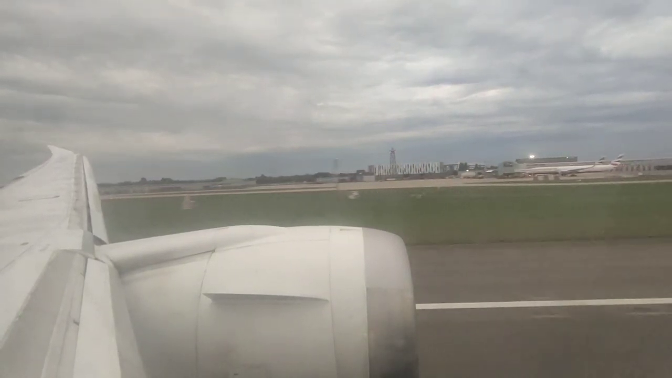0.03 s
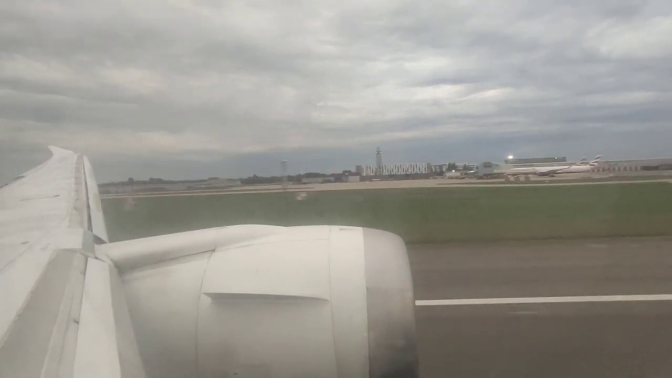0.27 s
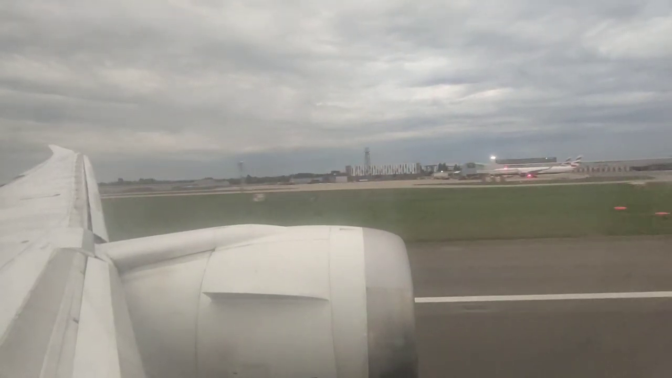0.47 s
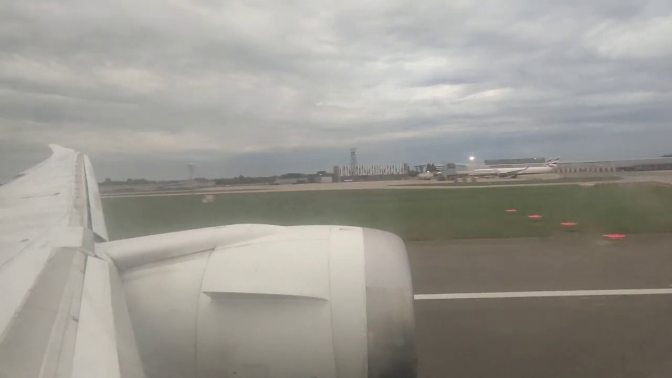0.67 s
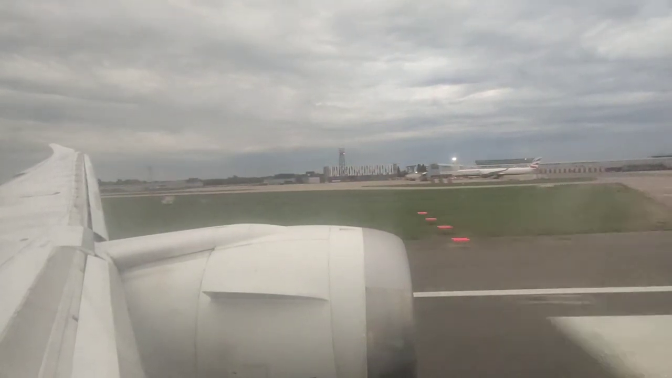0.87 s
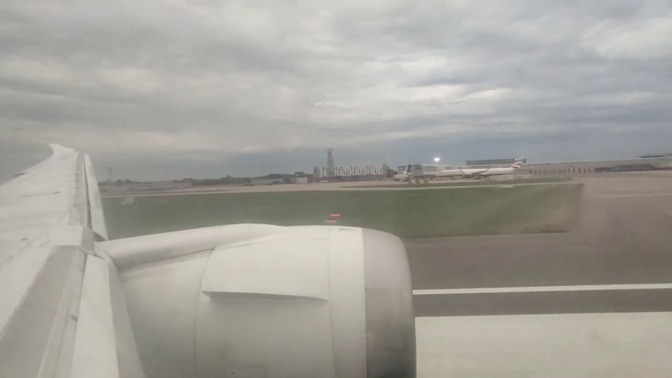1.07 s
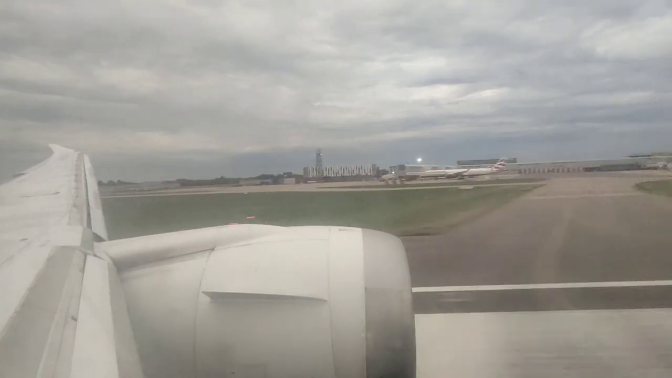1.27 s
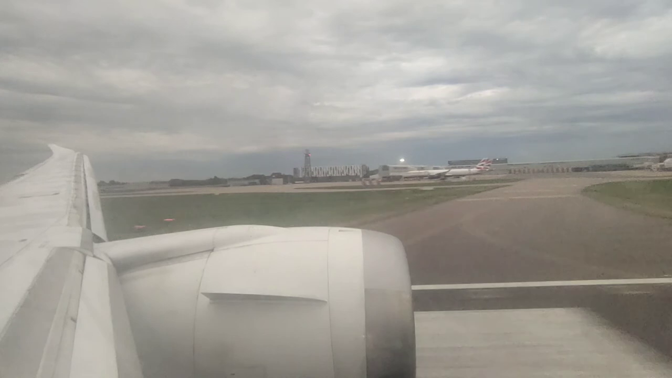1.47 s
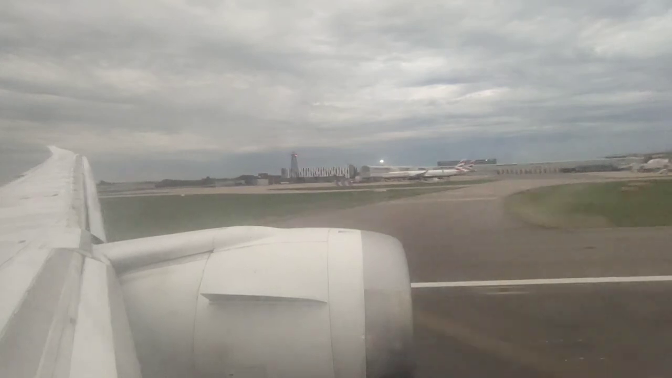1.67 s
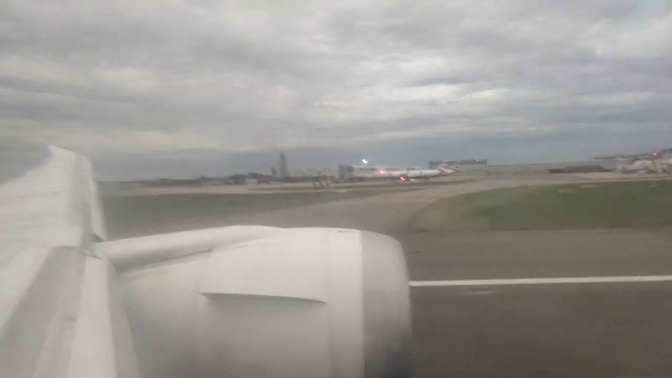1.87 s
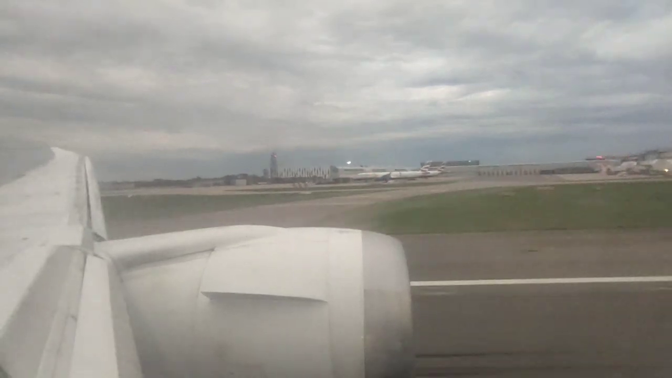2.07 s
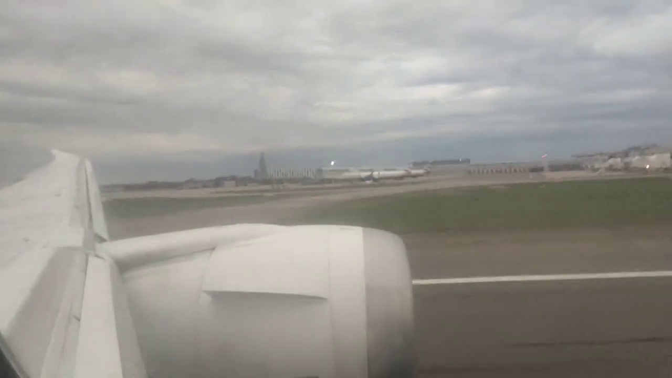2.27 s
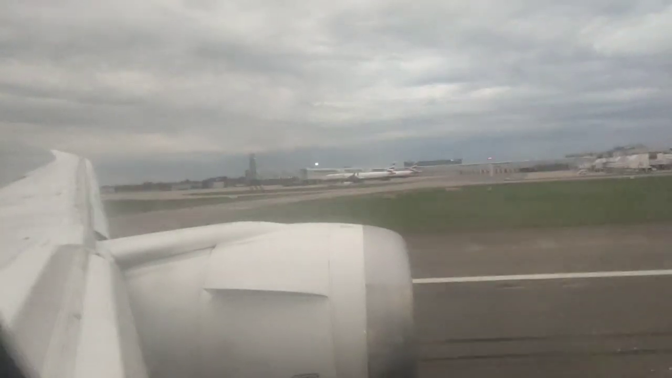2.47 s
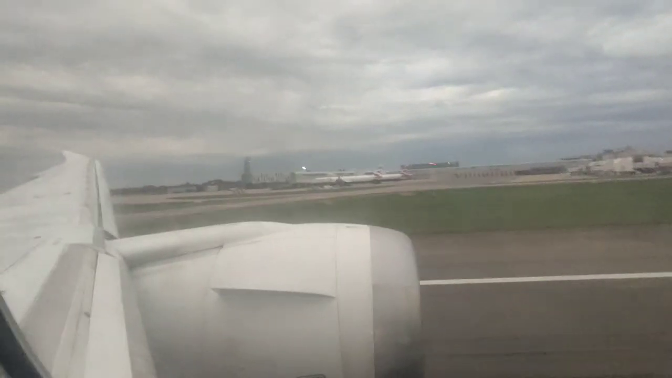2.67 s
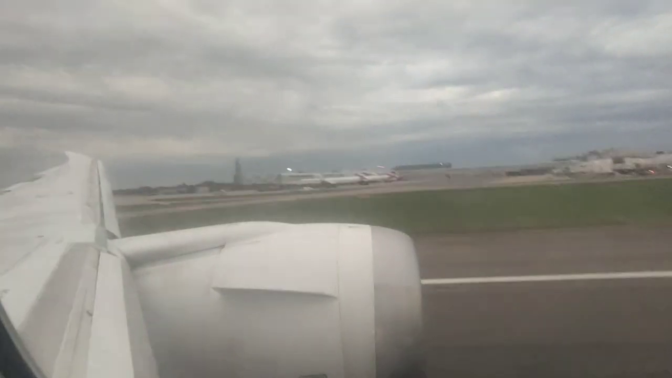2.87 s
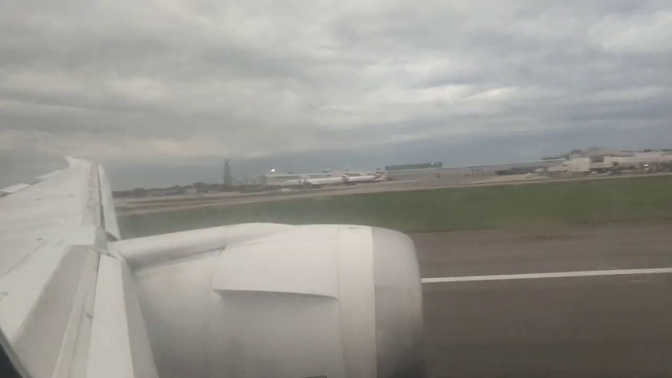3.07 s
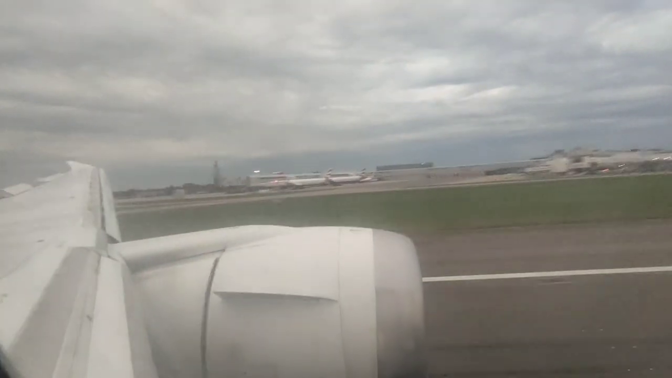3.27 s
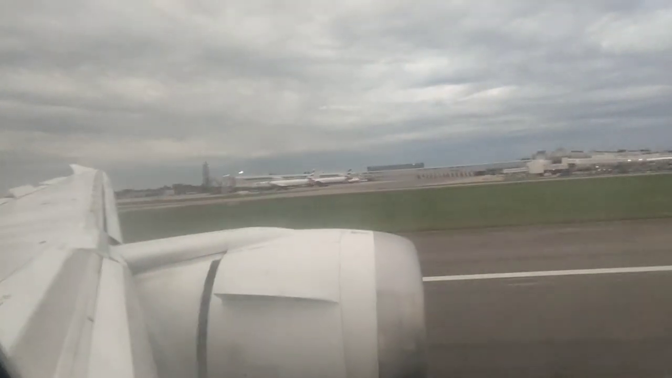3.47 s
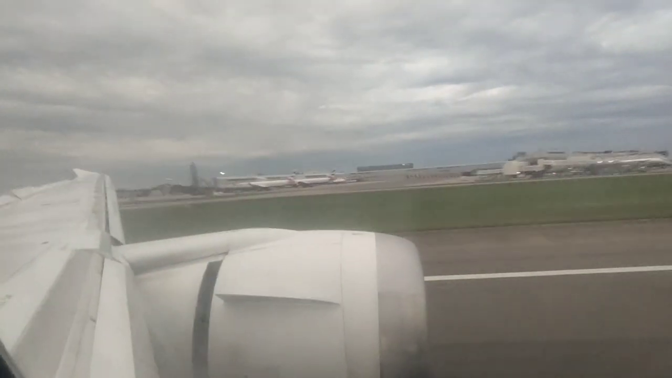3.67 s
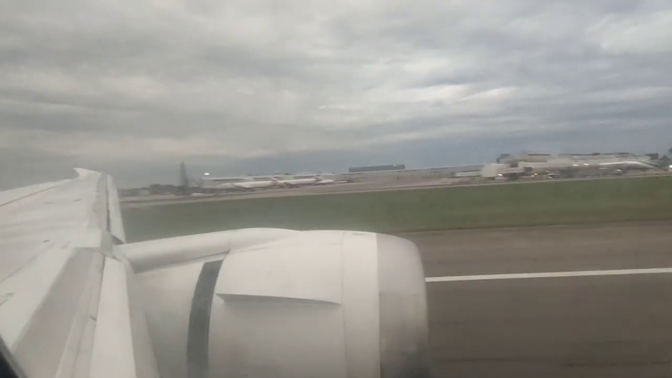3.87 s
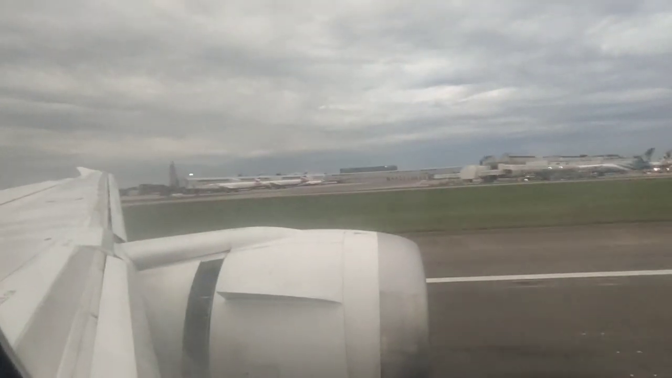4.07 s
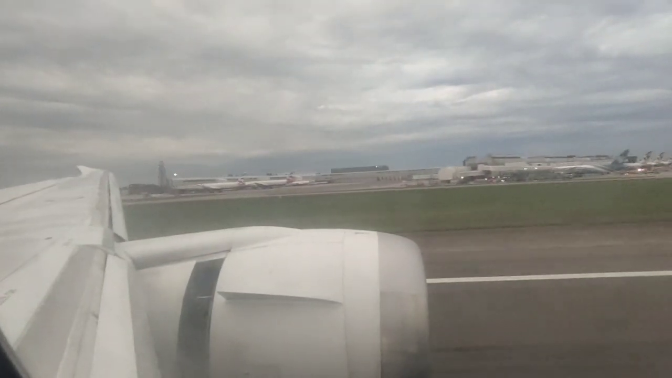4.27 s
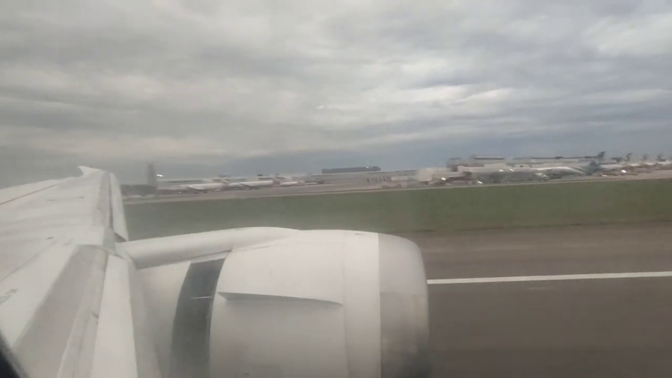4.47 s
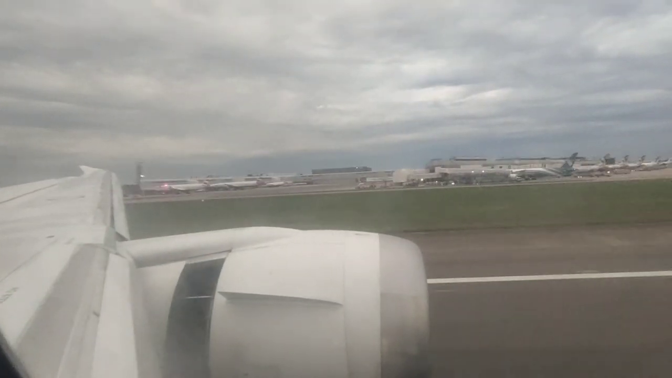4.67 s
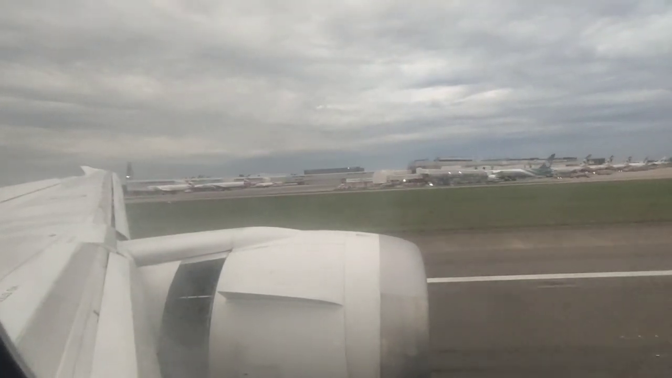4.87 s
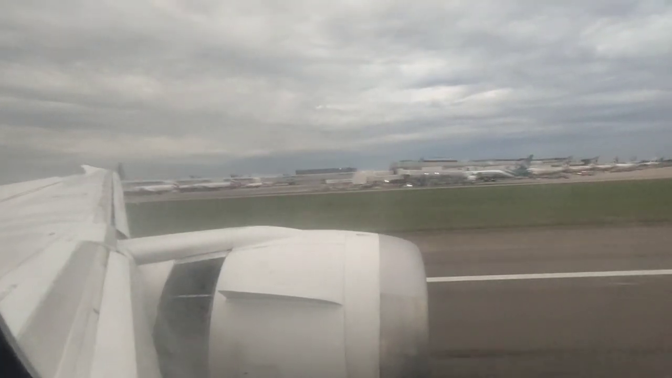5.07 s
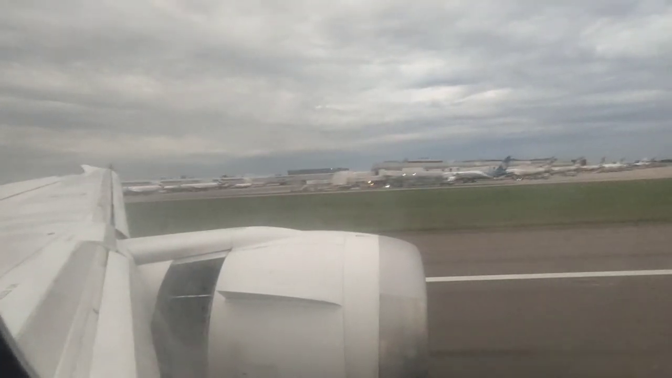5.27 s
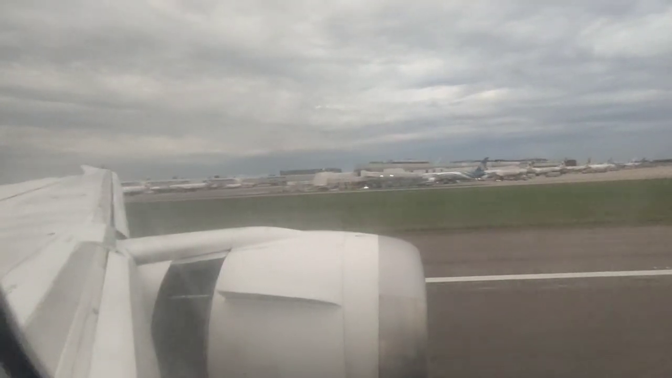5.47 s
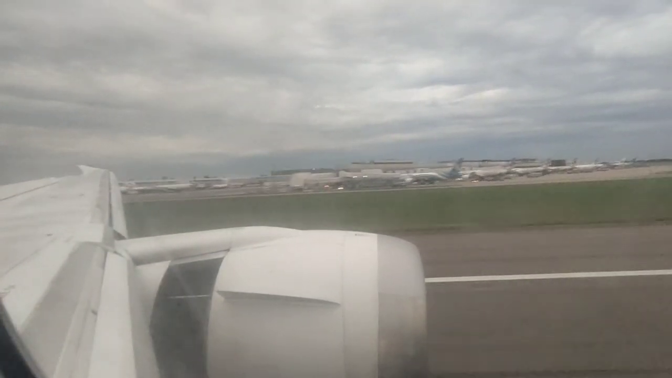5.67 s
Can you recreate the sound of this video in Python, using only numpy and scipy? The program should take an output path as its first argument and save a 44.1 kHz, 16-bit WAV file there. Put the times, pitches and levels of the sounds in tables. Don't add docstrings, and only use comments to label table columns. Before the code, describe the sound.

Inside an airliner cabin by the window, a deep steady drone with faint vent hiss holds for about a second and a half. Touchdown brings heavy low booms and a dense burst of locker and panel rattles with tiny latch clicks. Knocks thin out over softer bumps, then reverse thrust swells the roar with more deep jolts. Close, slightly overloaded stereo phone pickup.

```python
import sys
import numpy as np
from scipy import signal
from scipy.fft import rfft, irfft
from scipy.io import wavfile
from scipy.ndimage import uniform_filter1d

SR = 44100
rng = np.random.default_rng(int(sys.argv[2]) if len(sys.argv) > 2 else 0)


def gain_from_db(level_db):
    decades = np.asarray(level_db, float) / 20
    return 10 ** decades


def master(y):
    cut = np.clip(np.atleast_2d(y).T, -1, 1)
    pcm = np.round(cut * 32767)
    wavfile.write(sys.argv[1], SR, pcm.astype(np.int16))


N = 252252
HZ = np.fft.rfftfreq(N, 1 / SR)
TIME = np.arange(N) / SR
EARS = np.array([[1], [-1]])

# pitch_hz, level_db (per Hz)
CABIN_COLOUR = [(13, -63.5), (22, -42), (33, -26), (50, -24), (74, -6), (97, 1.5), (164, -2.5), (204, -4),
                (234, -7), (373, -11), (417, -19.5), (579, -23.5), (899, -28.5), (3010, -51), (3270, -47.5),
                (3550, -52), (15700, -63.5)]
# pitch_hz, width_hz, level_db
HULL_MODES = [(72, 17, -11), (117.4, 12.5, -0.5), (137.1, 12.1, 1), (202, 48, -4), (300, 88, -10)]
# pitch_hz, width_hz, level_db
LINING_MODES = [(509.6, 99, 2), (1490, 110, -4.5), (2520, 800, 1.5)]
RULE_HZ = (55, 120, 330, 900)


def drone():
    feels_gear = (1, 0.19, 0.01, 0.042)
    feels_thrust = (0.1, 0.9, 0.73, 0.69)
    feels_shake = (0.088, 0.027, 0.057, 0.59)
    moves = np.transpose([feels_gear, feels_thrust, feels_shake]) @ np.array(controls())
    spectrum = field(CABIN_COLOUR) * lift(HULL_MODES) * lift(LINING_MODES)
    boom = irfft(spectrum * (HZ > 75) * (HZ < 170), N)
    spectrum = spectrum * gain_from_db(-18.5) / np.sqrt(np.mean(boom ** 2))
    out = 0
    for octave in np.arange(4.5, 14.5, 0.5):
        share = np.cos(np.pi * np.clip(np.log2(HZ + 1) - octave, -0.5, 0.5)) ** 2
        pull = [on_hz(list(zip(RULE_HZ, row)), 2 ** octave) for row in np.eye(len(RULE_HZ))]
        pull[0] *= np.clip((octave - 4.6) / 1.5, 0.3, 1)
        pull[-1] *= np.clip((13.2 - octave) / 3.07, 0, 1)
        flutter_db = np.clip((11.3 - octave) / 0.83, 0.25, 1) * 0.99 * walk(7.4) + 0.75 * walk(20.873)
        out = out + gain_from_db(np.dot(pull, moves) + flutter_db) * irfft(spectrum * share, N)
    return out


# time_s, gear_load_db (above the flare)
GEAR_LOAD = [(1.5, 1.5), (1.68, 1.5), (1.78, -4.5), (1.9, 17), (2.3, 11.5), (2.55, 9.5), (2.8, 5.5),
             (3.0, 4.5), (3.35, 16), (3.7, 4), (4.0, 11), (4.6, 15.5), (5.2, 7), (5.45, 6), (5.72, 14.5)]


def controls():
    reverse_s, spool_s, reverse_db = 4.55, 0.32, 4.5
    gear = np.interp(TIME, *np.transpose(GEAR_LOAD))
    spool = np.clip((TIME - reverse_s) / spool_s, 0, 1)
    thrust = reverse_db * np.sin(spool * np.pi / 2) ** 2
    s, buzz_db, _ = np.transpose(TRIM_SHAKE)
    return gear, thrust, np.interp(TIME, s, buzz_db - buzz_db[0])


# start_s, level_db, pitch_hz
STRUT_BLOWS = [(1.65, -15, 75.2), (1.822, -13.5, 97), (1.91, -10.5, 84.4), (1.969, -9.5, 105.2),
               (2.062, -8.5, 107.2), (2.191, -14.5, 72), (2.3, -4.5, 119), (2.418, -10, 114),
               (2.47, -10, 115), (2.975, -14, 105), (3.198, -8.5, 100), (3.321, -14.5, 97.3),
               (3.86, -12.5, 91.6), (4.719, -11.5, 113.3), (4.962, -3.5, 97.4), (5.321, -4.5, 129.1),
               (5.549, -12, 117.4), (2.027, -17, 147.6), (3.0, -8.5, 114.2), (4.645, -21, 107.5),
               (4.78, -10, 119), (4.84, -19, 128.6), (5.081, -12, 119.3), (5.19, -11, 116.8),
               (5.69, -9.5, 107)]
# start_s, level_db, pitch_hz
SLAPS_AND_HEAVES = [(1.885, -26, 360), (1.935, -18, 227), (1.5, -23, 420), (2.179, -11.5, 320),
                    (2.5, -43, 400), (2.1, -20.5, 355), (2.7, -17, 450), (2.9, -30, 450),
                    (5.261, -13, 68.3), (5.45, -18, 64.4), (5.62, -33.5, 33.8), (3.879, -17.5, 39),
                    (1.84, -16, 68), (0.68, -25, 310), (0.28, -34, 780), (1.8, -16, 300), (2.0, -20.5, 200),
                    (3.4, -27, 370), (5.53, -21, 190), (5.37, -21, 68), (0.76, -27, 78), (3.1, -22, 75),
                    (3, -13.5, 110), (1.73, -24.5, 328), (3.979, -25, 370), (4.4, -18, 286), (4, -23, 400),
                    (4.79, -17, 340), (5.595, -19.5, 350)]


def thumps():
    rise_cycles = 2.07
    out = np.zeros(N + SR)
    t = TIME[:SR]
    for s, db, hz in STRUT_BLOWS + SLAPS_AND_HEAVES:
        rise = t * hz / rise_cycles
        swell = rise * np.exp(1 - rise)
        i = int(s * SR)
        out[i:i + SR] += gain_from_db(db) * swell * np.sin(2 * np.pi * hz * t)
    return out[:N]


# pitch_hz, level_db (per Hz)
CRACK_COLOUR = [(1470, -31.5), (2500, -0.5), (2920, -8.5), (3480, -6), (5910, -13), (6950, -6.5),
                (9970, -13), (10800, -17), (14700, -18), (15700, -22.5)]
# pitch_hz, level_db (per Hz)
PANEL_COLOUR = [(250, -33), (450, 3.5), (700, 3), (1000, 5.5), (1500, -7), (2000, -11.5), (2800, -44),
                (4500, -42)]


def trim():
    s, db, body_db, pan_db, t60, body_hz = knocks()
    sides = (gain_from_db(db) * gain_from_db(EARS * pan_db / 2)).T[:, :, None]
    bodies = gain_from_db(body_db)[:, None, None] * sides
    vent_hiss_db = -52.5
    sides = sides * np.sqrt(np.clip(1 - gain_from_db(vent_hiss_db - db) ** 2, 0.05, 1))[:, None, None]

    fronts = decays(s, gain_from_db(-9.0) * sides, 0.15 * t60, 0.00061)
    cracks = np.hypot(fronts, decays(s, gain_from_db(-9.0) * sides, t60, 0.0018))
    sharp = sides * gain_from_db(0.52 * (db + 26.5))[:, None, None]
    sizzles = np.hypot(decays(s, gain_from_db(-15.5) * sharp, 0.3 * t60, 0.0005),
                       decays(s, gain_from_db(-20.0) * sharp, 0.75 * t60, 0.0015))
    thuds = np.hypot(decays(s, gain_from_db(-3.5) * bodies, 0.35 * t60, 0.00052),
                     decays(s, gain_from_db(-2) * bodies, 0.85 * t60, 0.00092))

    buzz, buzz_sizzle, buzz_panel = buzzes()
    treble = field(CRACK_COLOUR)
    crack = unit(irfft(treble * (HZ < 10000), N))
    sizzle = unit(irfft(treble * (HZ >= 10000), N))
    panel = unit(irfft(field(PANEL_COLOUR) * lift(LINING_MODES), N))
    out = crack * np.hypot(cracks, buzz)
    out = out + sizzle * np.hypot(sizzles, buzz_sizzle)
    out = out + panel * np.hypot(thuds, buzz_panel)

    out = out + raps(s, gain_from_db(-5) * bodies, body_hz)
    out = out + rings(s, gain_from_db(-10.0) * bodies, body_hz, 1.55 * t60, 0.091)
    clasp_hz = 1870 * np.exp(0.15 * rng.standard_normal(len(s)))
    return out + rings(s, gain_from_db(-10.5) * sides, clasp_hz, 0.65 * t60, 0.093)


# start_s, crack_db, body_over_crack_db, t60_s
LOCKER_KNOCKS = [(0.538, -39.5, 8, 0.056), (0.9244, -50, 0, .1), (1.6804, -34.5, 10.5, 0.1),
                 (1.706, -30.5, 7, 0.1), (1.777, -33, 4, .13), (1.826, -29, 1, 0.051),
                 (1.86, -50, 4, 0.073), (2.172, -37.5, 17.5, 0.057), (2.183, -20, -1, 0.082),
                 (2.1896, -22.5, 3.5, .05), (2.1959, -26.5, 6, 0.032), (2.2846, -32.5, -8, 0.44),
                 (2.32, -32.5, 11.5, 0.13), (2.5874, -26.5, 7, 0.16), (2.694, -29.5, 2, 0.19),
                 (2.8552, -33, 7.5, 0.31), (2.9398, -29.5, 2, 0.2), (2.969, -29.5, 6.5, 0.045),
                 (3.0692, -32, 5, 0.062), (3.1161, -32.5, 6, 0.13), (3.2132, -25, 3, 0.057),
                 (3.26, -41.5, -3, .1), (3.3413, -33, 6.5, 0.1), (3.4252, -39, 13.5, .11),
                 (3.4524, -30.5, 4, 0.088), (3.5586, -34.5, -10.5, 0.1), (4.1833, -28.5, -1, 0.064),
                 (5.3702, -46, 11, 0.088), (5.595, -30, 6.5, 0.11)]
# start_s, crack_db, body_over_crack_db, body_hz
WALL_KNOCKS = [(0.2044, -46, 13, 655), (1.7923, -32.5, 6.5, 1160), (1.9437, -42, 17, 1040),
               (1.99, -36, 13.5, 820), (2.0494, -38, 13.5, 614), (2.1187, -37, 18, 1123),
               (2.244, -37, 13.5, 890), (2.3887, -31, 9.5, 1030), (2.4272, -36, 19, 780),
               (2.478, -31, -3, 942), (2.5494, -44, 20.5, 730), (2.619, -39, 13, 880),
               (3.0341, -25, 7.5, 880), (3.1642, -29.5, 7, 730), (3.1801, -33.5, 8.5, 1090),
               (3.3029, -31, 10.5, 717), (3.5198, -33, 9.5, 870), (3.6254, -36, 12.5, 823),
               (3.654, -38.5, 13, 590), (4.4914, -46, 11.5, 815), (4.55, -48, 21.5, 786),
               (4.597, -39, 8.5, 630), (4.694, -41, 9, 740), (4.7409, -43, 15.5, 724),
               (4.778, -42, 18.5, 610), (5.0894, -42, 13.5, 610), (5.1985, -44.5, 6, 670),
               (5.633, -38.5, 7.5, 756), (1.92, -47, 12, 520), (2.035, -41.5, 10.5, 760),
               (2.082, -42, 11.5, 560), (2.15, -39, 13.5, 620), (2.262, -37.5, 13.5, 1320),
               (2.283, -42, 10.5, 790), (2.312, -37, 16.5, 570), (2.369, -38.5, 9.5, 556),
               (2.523, -40.5, 13, 641), (2.706, -36, 13.5, 885), (4.505, -49.5, 16.5, 1300),
               (4.9, -44.5, 10, 2290), (5.305, -44.5, 16, 920), (5.36, -37.5, 8, 1140),
               (5.55, -42.5, 12.5, 850), (5.593, -41, 12.5, 800)]


def knocks():
    s, db, body_db, t60 = np.transpose(LOCKER_KNOCKS)
    wall_s, wall_db, wall_body_db, wall_hz = np.transpose(WALL_KNOCKS)
    pan_db = -2 + 4 * rng.standard_normal(len(s) + len(wall_s))
    locker_hz = 820 * np.exp(0.15 * rng.standard_normal(len(s)))
    wall_t60 = np.full(len(wall_s), 0.11)
    return (np.r_[s, wall_s], np.r_[db, wall_db], np.r_[body_db, wall_body_db], pan_db,
            np.r_[t60, wall_t60], np.r_[locker_hz, wall_hz])


# time_s, buzz_db, panel_over_buzz_db
TRIM_SHAKE = [(1.55, -62, 3), (1.7, -61, 15), (1.99, -55, -4), (2.16, -48, 6), (2.215, -52, 11),
              (2.245, -44.5, 8), (2.31, -42.5, 8), (2.46, -46, 8.5), (2.54, -56.5, 9), (2.7, -55.5, -1),
              (2.88, -57, 12.5), (3.07, -59.5, 5.5), (3.85, -60, 8), (5.48, -62.5, 10), (5.72, -54, 6)]


def buzzes():
    t, buzz_db, panel_db = np.transpose(TRIM_SHAKE)
    contacts_per_s, contact_decay_s = 650, 0.0095
    contacts = (rng.random(N) < contacts_per_s / SR) * gain_from_db(2.3 * rng.exponential(size=N))
    power = signal.lfilter([1], [1, -np.exp(-1 / (contact_decay_s * SR))], contacts ** 2)
    buzz = gain_from_db(np.interp(TIME, t, buzz_db, left=-120) + 2.5) * unit(np.sqrt(power))
    brighter_db = 0.2 * (np.interp(TIME, t, buzz_db) + 55)
    return buzz, gain_from_db(-10.0) * buzz * gain_from_db(brighter_db), buzz * gain_from_db(np.interp(TIME, t, panel_db))


def raps(times, sizes, pitches_hz):
    out = np.zeros((2, N + SR))
    for s, size, hz in zip(times, sizes, pitches_hz):
        turns = hz * TIME[:SR // 20]
        tone = np.sin(2 * np.pi * turns) + gain_from_db(-6) * np.sin(2 * np.pi * 1.7 * turns)
        i = int(s * SR)
        out[:, i:i + len(turns)] += size * gain_from_db(-60 * turns / 10) * tone
    return out[:, :N]


def rings(times, sizes, pitches_hz, t60s, widths):
    out = np.zeros((2, N + SR))
    t = TIME[:SR // 8]
    widths = np.broadcast_to(widths, len(times))
    for s, size, hz, t60, width in zip(times, sizes, pitches_hz, t60s, widths):
        edges_hz = [hz / (1 + width), min(hz * (1 + width), 0.49 * SR)]
        band = signal.butter(1, edges_hz, "band", fs=SR, output="sos")
        noise = rng.standard_normal((2, len(t))) + 0.88 * rng.standard_normal(len(t))
        ring = unit(signal.sosfilt(band, noise))
        i = int(s * SR)
        out[:, i:i + len(t)] += size * ring * gain_from_db(-60 * t / t60)
    return out[:, :N]


# start_s, level_db, left_over_right_db, pitch_hz
CASE_TICKS = [
    (2.0837, -36, 10, 14650),
    (2.0937, -37, 7, 14050),
    (4.663, -39.5, 7, 15000),
    (5.3847, -41.5, 5.5, 15600),
]
# start_s, level_db, left_over_right_db, pitch_hz
LATCH_TICKS = [(5.01, -44, 12, 7280), (5.127, -41.5, 8.5, 3450), (5.158, -48, -3, 6780),
               (5.2485, -45.5, -8, 7140), (5.329, -46, -6, 8500), (5.343, -43.5, -7.5, 7400),
               (5.423, -40.5, -5, 7430), (1.682, -36, -7, 8900), (1.708, -42, -7, 9300),
               (1.779, -43.5, -2.5, 8500), (1.795, -45.5, -2.5, 8300), (1.944, -42, -5, 8800),
               (2.588, -34.5, -3.5, 7960), (2.857, -37, 1, 7200), (3.119, -44, 0.5, 8200),
               (2.118, -40, -1.5, 7550), (2.128, -42, -3, 8300), (2.0, -40, -2.5, 8600),
               (2.235, -41, -1, 6800), (2.277, -42.5, 1.5, 7600), (3.428, -40.5, 1.5, 6840),
               (4.495, -49.5, 2, 4280), (4.594, -44.5, 2, 2620), (5.088, -48, 0.5, 4200),
               (5.197, -52, 4, 2590), (5.596, -40.5, -1.5, 7000), (5.635, -44, -0.5, 4700),
               (2.12, -34, -2, 1530), (2.247, -34, 0.5, 1700), (2.615, -31, -5, 1750),
               (2.862, -37, 1.5, 2260), (3.036, -30.5, -2, 2470), (3.119, -34.5, 0, 2420),
               (3.167, -42.5, 1, 2450), (3.175, -36.5, -1.5, 1700), (3.31, -36, -2, 1800),
               (3.427, -35, -1, 1780), (3.522, -35.5, -2, 1790), (3.655, -40, -1.5, 1800)]


def ticks():
    s, db, pan_db, hz = np.transpose(list(CASE_TICKS) + list(LATCH_TICKS))
    case = np.arange(len(s)) < len(CASE_TICKS)
    sides = (gain_from_db(db) * gain_from_db(EARS * pan_db / 2)).T[:, :, None]
    tones = sides * gain_from_db(np.where(case, -1.5, -5))[:, None, None]
    snaps = sides * gain_from_db(np.where(case, -3, -5.0))[:, None, None]
    ring_cycles = np.where(case, 110, 330)
    out = rings(s, tones, hz, ring_cycles / hz, 0.027)
    snap_hz = np.where(case, 12500, 10000)
    return out + rings(s, snaps, snap_hz, np.full(len(s), 0.007), np.where(case, 0.3, 0.9))


# start_s, length_s, top_hz, partner_over_top (ratio), level_db
SEAL_SQUEAKS = [
    (2.78, .08, 1870, 1.02, -48),
    (2.765, 0.039, 2520, 1.25, -50),
    (4.29, .04, 11000, 1.12, -79),
    (4.395, .09, 10900, 1.17, -61),
    (4.48, .03, 10600, 1.05, -69),
    (4.53, .03, 11860, .97, -63),
    (4.555, 0.027, 10900, .96, -63),
    (4.585, 0.022, 9400, .93, -64),
]


def squeaks():
    out, wobble = 0, walk(120)
    for s, length, hz, partner, db in SEAL_SQUEAKS:
        u = (TIME - s) / length
        fade = np.clip(np.minimum(u, 1 - u) * length / 0.012, 0, 1)
        main_hz = hz * np.interp(u, [0, 0.15, 0.62, 1], [0.94, 1, 1, 0.92])
        partner_hz = hz * (partner - 0.04 * u)
        main, second = (np.sin(2 * np.pi * np.cumsum(f * (1 + 0.004 * wobble)) / SR)
                        for f in (main_hz, partner_hz))
        out = out + fade * gain_from_db(db + 2.3 * wobble) * (main + gain_from_db(-9 + 2.6 * walk(59.6)) * second)
    return out * gain_from_db(EARS * -4.5)


# pitch_hz, first_level_db, last_level_db
WHINE_TONES = [(3194, -62, -63.5), (4791, -76, -71), (7562, -85, -81), (9114, -81, -92), (10080, -81, -83),
               (10712, -87, -83), (10890, -79, -83), (11343, -88, -83), (11832, -92, -87)]


def whine():
    out = 0
    for hz, first_db, last_db in WHINE_TONES:
        level_db = first_db + (last_db - first_db) * TIME / TIME[-1] + 0.4 * walk(15)
        phase = 2 * np.pi * np.cumsum(hz * (1 + 0.0004 * walk(18.0))) / SR
        out = out + np.sqrt(2) * gain_from_db(level_db) * np.sin(phase + EARS * rng.uniform(0, 0.33))
    return out


def on_hz(table, hz=HZ):
    f, v = np.transpose(table)
    return np.interp(np.log(hz + 1), np.log(f + 1), v)


def unit(x):
    return x / np.sqrt(np.mean(x ** 2))


# pitch_hz, side_over_mid_db
PORT_SIDE_LEVEL = [(60, -17.5), (110, -17), (200, -15.5), (380, -8.5), (700, 0.5), (1290, 0), (2380, 1),
                   (4400, 1.5), (8120, 0.5), (15000, 0)]


def field(colour):
    mid, side = rfft(rng.standard_normal((2, N)))
    return gain_from_db(on_hz(colour)) * (mid + EARS * gain_from_db(on_hz(PORT_SIDE_LEVEL)) * side)


def lift(modes):
    return 1 + sum(gain_from_db(db) / (1 + 2j * (HZ - hz) / width) for hz, width, db in modes)


def walk(rate):
    k = int(SR / rate)
    held = np.repeat(rng.standard_normal(N // k + 1), k)
    return 1.47 * uniform_filter1d(uniform_filter1d(held, k), k)[:N]


def decays(times, sizes, t60s, rise_s):
    power = np.zeros((2, N))
    for s, size, t60 in zip(times, sizes, t60s):
        i = int(s * SR)
        t = TIME[:min(N - i, int(t60 * SR) + 1)]
        power[:, i:i + len(t)] += (size * (1 - np.exp(-t / rise_s)) * gain_from_db(-60 * t / t60)) ** 2
    return np.sqrt(power)


def scene():
    return drone() + thumps() + trim() + ticks() + squeaks() + whine()


# pitch_hz, left_over_right_db
PORT_BALANCE_LEVEL = [(60, 1), (200, -1), (700, 2.5), (2400, 0.5), (5500, 1.5), (6900, 4.5), (8500, -6.5),
                      (10000, 1.5), (12000, 2), (15000, 8.5)]


def phone_ports(dry):
    end = np.clip(TIME[::-1] / 0.002, 0.25, 1)
    wide = np.fft.rfftfreq(2 * N, 1 / SR)
    balance = gain_from_db(EARS * on_hz(PORT_BALANCE_LEVEL, wide) / 2)
    return irfft(rfft(end * dry, 2 * N) * balance * (wide < 15700), 2 * N)[:, :N]


def low_pass(x):
    return signal.sosfilt(signal.butter(12, 15830, fs=SR, output="sos"), x)


def record(dry):
    rounded = np.tanh(0.86 * phone_ports(dry)) / 0.83
    return low_pass(rounded)


dry = scene()
out = record(dry)
master(out)
```